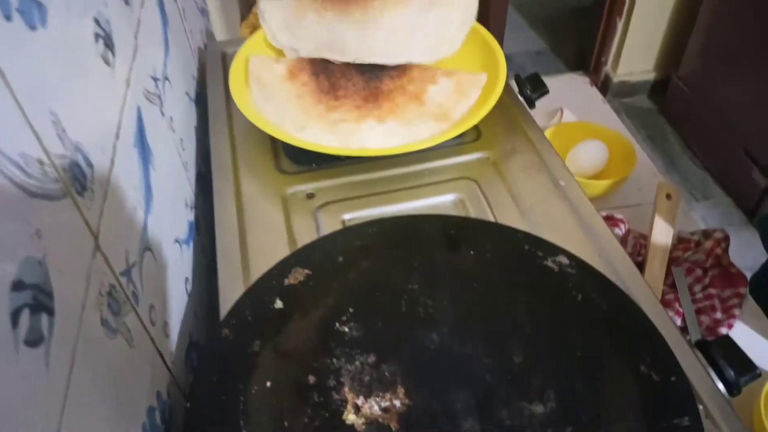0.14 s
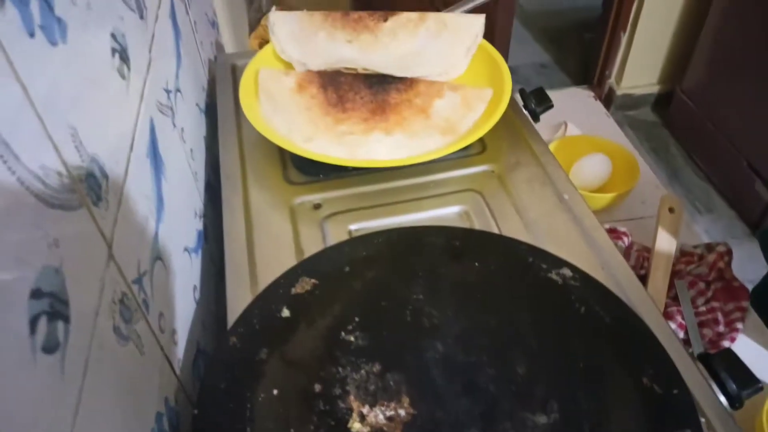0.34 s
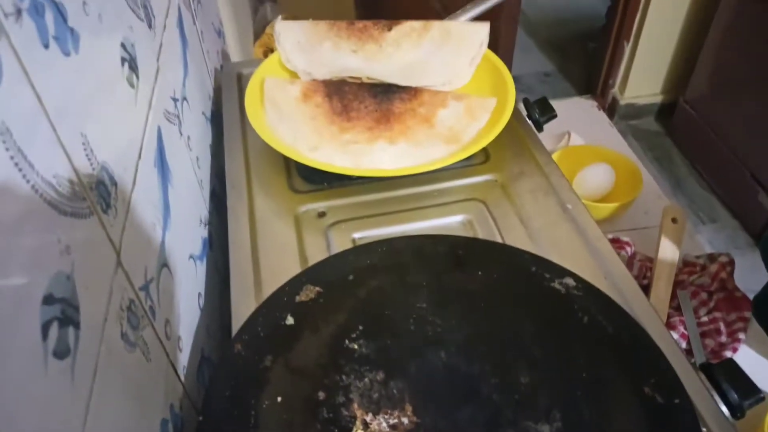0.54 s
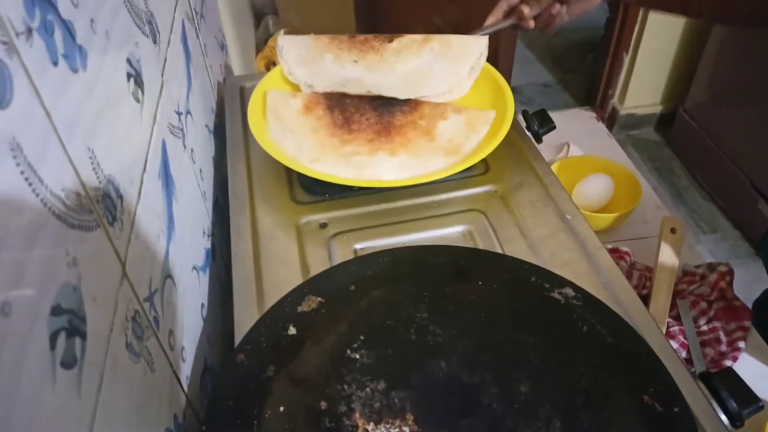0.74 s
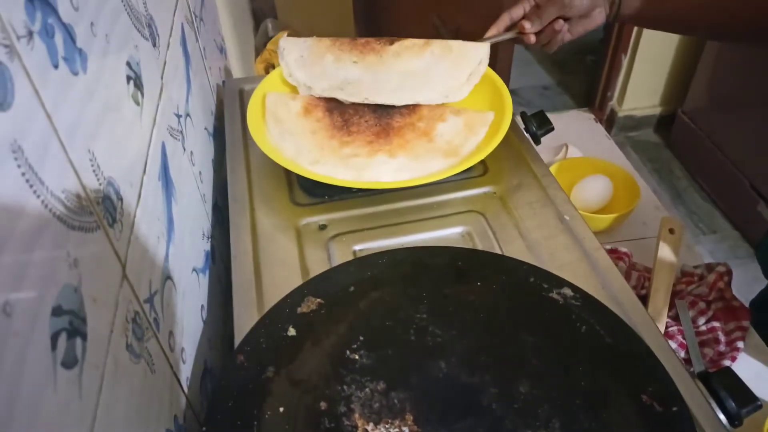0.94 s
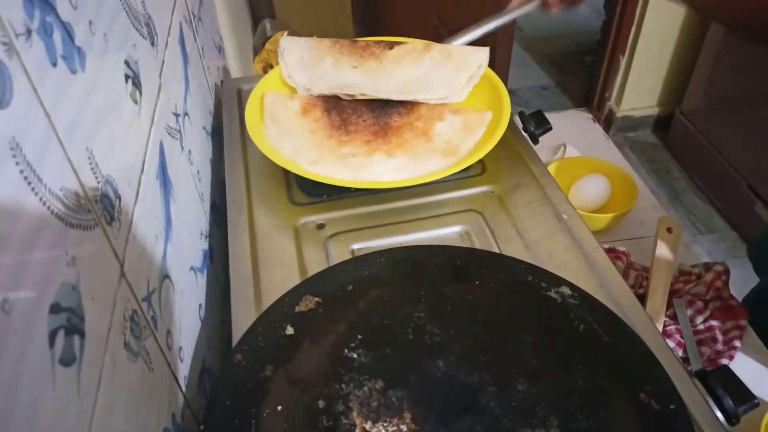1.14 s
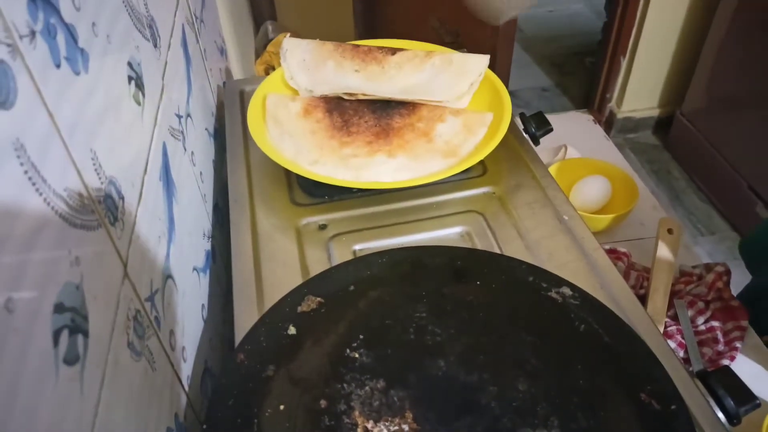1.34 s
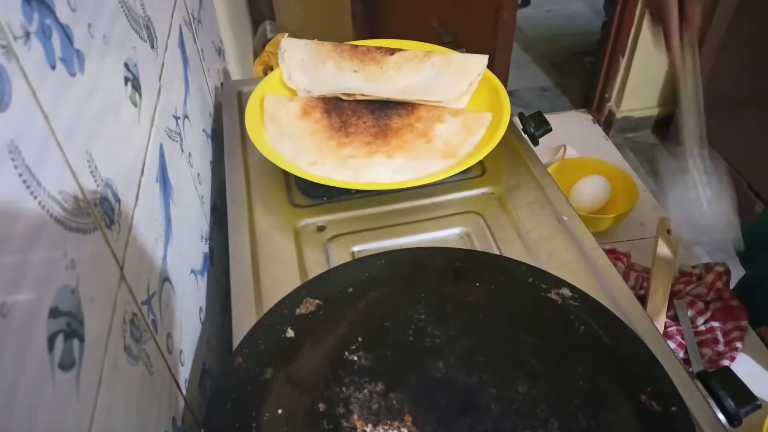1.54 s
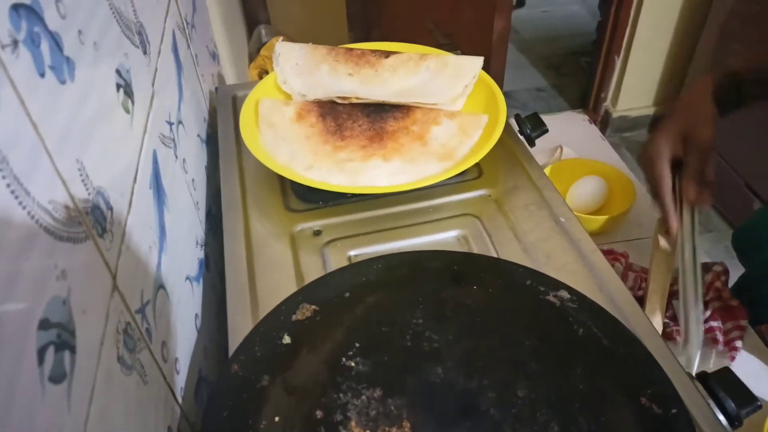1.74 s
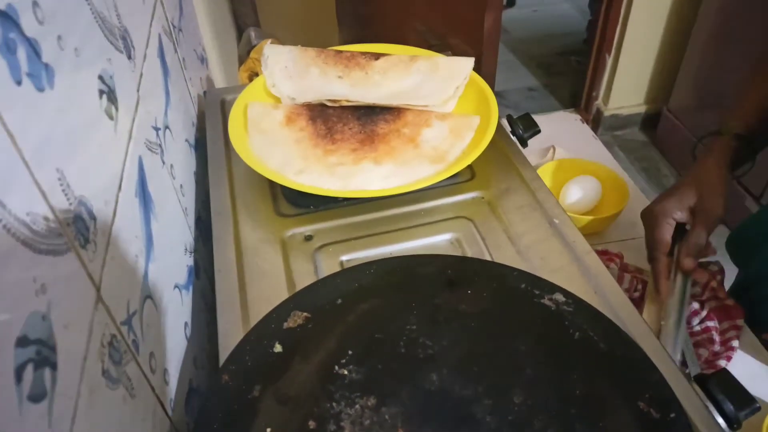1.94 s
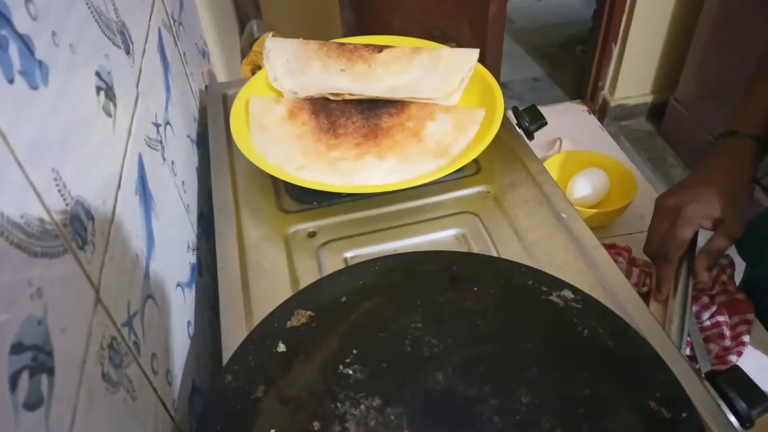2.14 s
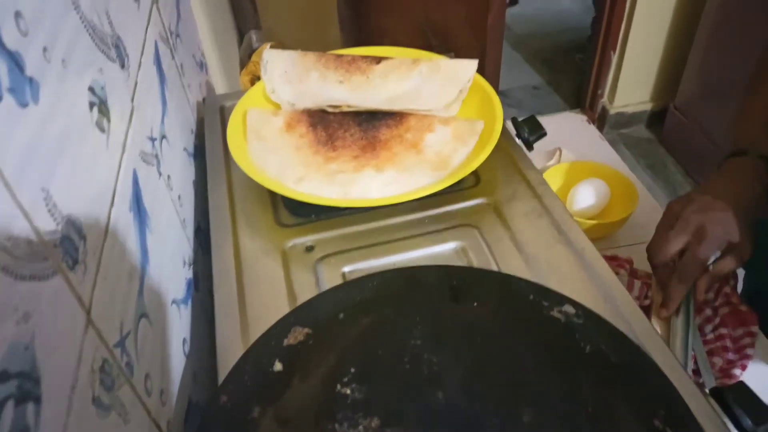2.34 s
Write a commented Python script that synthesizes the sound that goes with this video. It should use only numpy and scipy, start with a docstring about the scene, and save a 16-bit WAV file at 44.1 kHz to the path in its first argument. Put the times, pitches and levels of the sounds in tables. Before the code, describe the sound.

Close, uneven knocks of a metal spatula on a plate thud through a steel stove top in a small kitchen. The spatula slides free and is set down with a clatter, while a griddle softly hisses and pops.

```python
"""Spatula and sizzling griddle

A steel spatula knocks a folded flatbread into place on a plate, thudding through the steel stove top
beneath. It scrapes out with a faint ring and clatters down among the utensils at the side.
Close by, the hot griddle sizzles faintly and spits oil; a small tiled kitchen answers."""
import sys
import numpy as np
from scipy import signal
from scipy.fft import rfft, irfft
from scipy.io import wavfile

SR = 44100
rng = np.random.default_rng(int(sys.argv[2]) if len(sys.argv) > 2 else 0)


def output_pcm(signal):
    """Save a mono or channel-first signal as 16-bit PCM at the path in sys.argv[1].

    Samples are clipped to [-1, 1] before scaling.
    """
    pcm = np.clip(np.atleast_2d(signal).T, -1, 1) * 32767
    wavfile.write(sys.argv[1], SR, np.round(pcm).astype(np.int16))


N = 110250

# Hits on the plate: (time [s], thud [dB], click [dB], thud pitch [Hz], thud attack [cycles])
PLATE_KNOCKS = [(0.185, -38, -43, 347, 1.9), (0.2456, -22, -26, 337, 1.24), (0.2552, -8.5, -25, 392, 0.82),
                (.3402, -16, -29.5, 402, 1.2), (.4575, -22, -37, 342, 0.67),
                (0.6095, -18, -29.5, 396.4, 1.95), (0.7108, -21.5, -27, 433, 0.73),
                (0.7335, -13.5, -29, 376, 1.1), (0.9292, -17, -38.5, 375, 1.2),
                (1.1096, -16.5, -27.5, 435, 0.84), (1.187, -26.5, -25.5, 424, 1.7),
                (1.225, -28, -53, 438, 2.9), (1.267, -15, -36, 349, 0.99)]
# After-ring of plate and stove top: (pitch [Hz], level [dB], t60 [s])
STOVE_MODES = [(164.5, -2, 0.59), (186.4, 7.5, 0.13), (315, -3, 0.24), (428.4, -8, 0.21),
               (535.5, -15.5, 0.19)]
# Bright bite of the steel contact: (frequency [Hz], level [dB])
CLICK_SPECTRUM = [(100, -2), (700, 3.5), (1500, 4.5), (2900, 8.5), (4600, 0.5), (5800, 2.5), (8200, 1),
                  (10500, -15.5), (15000, -8)]
def plate(stove_db=-7.5):
    """Each knock is a steel click, a short thud and a faint after-ring of the stove top."""
    body, clicks = np.zeros((2, N))
    for s, thud_db, click_db, hz, cycles in PLATE_KNOCKS:
        add(body, s, amp(thud_db) * thud(hz, cycles))
        add(body, s, amp(thud_db + stove_db) * body_ring(STOVE_MODES, favoured_hz=hz))
        add(clicks, s, amp(click_db) * burst(CLICK_SPECTRUM, t60=0.032))
    return room(body, wet_db=-9.5, predelay_s=0.022) + room(clicks, wet_db=-0.5)


# Tight slap off the tiled corner: (delay [s], gain [signed ratio])
TILE_ECHOES = [(.0053, -.34), (.0081, -.5), (.0161, .33), (.0224, .35), (.0453, -.1)]
def thud(hz, attack_cycles, fall_octaves_per_s=7.9):
    """A damped knock of a few cycles and its early reflections, the later ones lower and duller."""
    t, out = np.arange(SR // 10) / SR, np.zeros(SR // 5)
    direct = (0.00029, 0.93)
    for delay, gain in [direct] + TILE_ECHOES:
        cycles = t * hz * 2 ** (-fall_octaves_per_s * delay)
        envelope = (cycles / attack_cycles * np.exp(1 - cycles / attack_cycles)) ** 2
        add(out, 0.0005 + delay, -gain * envelope * np.sin(2 * np.pi * cycles))
    return out


def body_ring(modes, favoured_hz, slow_below_hz=340):
    """A struck body rings; bending waves are slower at low pitch, so low modes bloom late."""
    t, out = np.arange(SR) / SR, np.zeros(SR)
    for hz, db, t60 in modes:
        octaves_below = max(0, np.log2(slow_below_hz / hz))
        lag_s, attack_s = 0.01317 * octaves_below, 0.0028 + 0.0079 * octaves_below
        swell = 1 - np.exp(-t / attack_s)
        start_db = db - 13 * abs(np.log2(hz / favoured_hz))  # far-off modes answer less
        add(out, lag_s, -amp(start_db - 60 * t / t60) * swell * np.sin(2 * np.pi * hz * t))
    return out


# Low weight under two of the knocks: (time [s], level [dB])
FRAME_BOOMS = [(1.125, -40), (1.301, -36)]
def stove_frame(hz=119, t60=1, attack_s=0.023):
    """The stove's frame swells into a low boom as the plate settles back."""
    out = np.zeros(N)
    swell = 1 - np.exp(-np.arange(SR) / SR / attack_s)
    for s, db in FRAME_BOOMS:
        add(out, s, amp(db) * swell * ringing([(hz, 0, t60)]))
    return out


# Strokes of the sliding blade: (start [s], length [s], level [dB])
BLADE_STROKES = [(0.173, 0.069, -50), (0.245, 0.034, -40), (1.104, 0.099, -44), (1.189, 0.054, -38),
                 (1.215, 0.033, -35.5), (1.27, 0.0178, -36), (1.902, 0.0235, -37)]
# Rasp of a single slip: (frequency [Hz], level [dB])
SLIP_SPECTRUM = [(700, -5), (1100, -5.5), (2700, 4), (3900, -0.5), (5800, 2.5), (8000, 3.5), (9500, -15.5),
                 (15000, -13.5)]
# Thin ring of the free blade: (pitch [Hz], level [dB], t60 [s])
BLADE_MODES = [(2194, -3, 0.11), (2627, 0.5, 0.41), (2800, -4, 0.28), (3120, 5, 0.057), (6160, -4, 0.11)]
def blade(held_t60=0.036, release_s=1.274, release_db=-37):
    """Tiny slips under each stroke excite the blade, which rings on once it comes free."""
    pressure = np.zeros(N)
    for s, length, db in BLADE_STROKES:
        add(pressure, s, amp(db) * signal.windows.tukey(round(length * SR), 0.5))
    slips = grains(per_s=2200, spread_db=1.3)
    rasp = pressure * unit(signal.fftconvolve(slips, burst(SLIP_SPECTRUM, t60=0.011))[:N])
    free_ring = ringing(BLADE_MODES)
    choked_ring = free_ring * amp(-60 * np.arange(SR) / SR / held_t60)
    out = room(rasp + amp(-13) * resonate(rasp, choked_ring), wet_db=-3)
    add(out, release_s, amp(release_db) * free_ring)
    return out


# The spatula set down: (time [s], thud [dB], clack [dB], thud pitch [Hz], shelf ring [dB])
SHELF_LANDINGS = [(1.809, -32, -39, 289, -35), (1.8315, -25, -31.5, 202, -46),
                  (1.912, -32.5, -35.5, 394, -40), (2.0393, -30, -33.5, 231, -29),
                  (2.138, -50, -38, 253, -31.5), (2.446, -77, -71, 352, -38.5)]
# Hollow ring of the utensils and their shelf: (pitch [Hz], level [dB], t60 [s])
SHELF_MODES = [(108, 0, 0.51), (171.6, -6, 0.3), (192.2, 0.5, 0.43), (255.6, 0, 0.47), (503.1, 3, 0.22),
               (701, -3.5, 0.14)]
# Darker contact of the landing: (frequency [Hz], level [dB])
CLACK_SPECTRUM = [(300, 9), (1200, -6), (2100, -2.5), (3700, -12.5), (11000, -25.5)]
def shelf():
    """The spatula lands in clacks and thuds, and the shelf rings under it."""
    body, clacks = np.zeros((2, N))
    for s, thud_db, clack_db, hz, ring_db in SHELF_LANDINGS:
        add(body, s, amp(thud_db) * thud(hz, attack_cycles=1.26))
        add(body, s, amp(ring_db) * body_ring(SHELF_MODES, favoured_hz=378))
        add(clacks, s, amp(clack_db) * burst(CLACK_SPECTRUM, t60=0.06))
    return room(body, wet_db=-3.5) + room(clacks, wet_db=1.5)


# Bright accents, each: partials (pitch [Hz], level [dB]), t60 [s], hits (time [s], level [dB])
EDGE_ON_PLATE = [(555, -2), (1254, 3.5), (2380, -3), (2830, -4), (3620, 4)], 0.034, [(1.1103, -31)]
LANDING_RING = [(813, -8), (1950, -13), (2185, -0.5), (2330, -6.5)], .08, [(1.8315, -34)]
LANDING_JINGLE = [(2143, -7), (2439, 2.5), (3025, -0.5), (3865, -3), (4818, -4), (6912, -7), (8721, 0),
                  (11070, -7)], 0.14, [(1.907, -46), (1.955, -45)]
UTENSIL_CLINK = [(1860, -6.5), (2625, 2.5)], .023, [(2.3501, -33)]
def metal_rings():
    """The blade's edge hits the plate, the spatula rings and jingles as it lands, a utensil clinks."""
    out = np.zeros(N)
    for partials, t60, hits in EDGE_ON_PLATE, LANDING_RING, LANDING_JINGLE, UTENSIL_CLINK:
        ring = ringing([(hz, db, t60) for hz, db in partials])
        for s, db in hits:
            add(out, s, amp(db) * ring)
    return room(out, wet_db=-7)


# Pops of hot oil: (time [s], level [dB])
OIL_SPITS = [(0.0835, -29), (0.121, -18), (.2462, -9.5), (0.3297, -21), (0.4057, -15.5), (0.66, -16.5),
             (0.7126, -9), (1.363, -27.5), (1.5106, -33), (2.104, -22.5), (2.1666, -23), (2.216, -21.5),
             (2.2671, -28.5)]
# Crisp snap of one pop: (frequency [Hz], level [dB])
SPIT_SPECTRUM = [(300, -26), (1500, -71), (2700, -0.5), (4000, -7), (7500, 5.5), (11000, -6), (14000, -1.5),
                 (16000, 4.5)]
def oil_spits(neutral_db=-15):
    """Oil spits off the griddle in single snaps; the smaller the spit, the brighter."""
    out = np.zeros(N)
    for s, db in OIL_SPITS:
        add(out, s, amp(db) * burst(SPIT_SPECTRUM, t60=0.0062, tilt_db=0.58 * (neutral_db - db)))
    return room(out, wet_db=-11)


# Fine frying hiss: (frequency [Hz], level [dB])
SIZZLE_SPECTRUM = [(500, -5.5), (2800, 6), (4500, -3.5), (8000, 0.5), (10500, -13), (15000, -8)]
# Fader ride on the sizzle: (time [s], level [dB])
SIZZLE_RIDE = [(0, -56), (.4, -50), (.6, -55.5), (1.4, -52.5), (1.75, -64.5), (2.0, -48), (2.45, -57.5)]
def sizzle():
    """Thousands of tiny clicks on the hot griddle blur into a hiss that swells and sinks."""
    level = amp(np.interp(np.arange(N) / SR, *np.transpose(SIZZLE_RIDE)))
    crackle = room(grains(per_s=8000, spread_db=-2.0), wet_db=-7.5)
    return level * colour(crackle, SIZZLE_SPECTRUM)


# Dark bed of kitchen noise: (frequency [Hz], level [dB])
ROOM_TONE_SPECTRUM = [(20, -36), (65, -2.5), (120, 6), (190, -2.5), (700, -15.5), (4500, -26.5),
                      (8000, -56)]
def room_tone(db=-51):
    """A steady low rush sits under everything."""
    return amp(db) * colour(rng.standard_normal(N), ROOM_TONE_SPECTRUM)


# Short tail of the tiled kitchen: (frequency [Hz], t60 [s])
KITCHEN_DECAY = [(150, 0.54), (400, 0.45), (2800, 0.45), (7500, 0.3), (15000, 0.35)]
def room(x, wet_db, predelay_s=0.004):
    """Adds the kitchen's dense reflections, each band dying at its own speed."""
    hz, t, bands = signal.stft(rng.standard_normal(SR), SR)
    tail = signal.istft(bands * amp(-60 * t / curve_at(KITCHEN_DECAY, hz)[:, None]), SR)[1]
    tail *= np.arange(len(tail)) > predelay_s * SR
    return x + amp(wet_db) * resonate(x, tail)


def ringing(modes):
    """Dying partials of struck metal."""
    t = np.arange(SR) / SR
    return sum(amp(db - 60 * t / t60) * np.sin(2 * np.pi * hz * t) for hz, db, t60 in modes)


def burst(spectrum, t60, tilt_db=0):
    """A contact transient: resonances so dense and brief that they sound as noise."""
    t = np.arange(SR // 10) / SR
    return colour(rng.choice([-1., 1.], len(t)), spectrum, tilt_db) * amp(-60 * t / t60)


def grains(per_s, spread_db):
    """A random train of tiny clicks of uneven size."""
    sizes = rng.standard_normal(N) * amp(spread_db * np.minimum(rng.exponential(1, N), 4))
    return sizes * (rng.random(N) < per_s / SR)


def resonate(x, response):
    """Plays a signal through an impulse response scaled to unit energy."""
    return signal.fftconvolve(x, response / np.linalg.norm(response))[:N]


def colour(x, spectrum, tilt_db=0):
    """Applies an EQ curve and a tilt per octave, and returns rms 1."""
    hz = np.fft.rfftfreq(len(x), 1 / SR)
    eq_db = curve_at(spectrum, hz) + tilt_db * np.log2(hz + 20)
    return unit(irfft(rfft(x) * amp(eq_db), len(x)))


def curve_at(points, hz):
    """Reads a curve on a log-frequency axis."""
    point_hz, values = np.transpose(points)
    return np.interp(np.log(hz + 1), np.log(point_hz), values)


def add(mix, s, sound):
    """Mixes a sound in at time s."""
    part = mix[round(s * SR):][:len(sound)]
    part += sound[:len(part)]


def amp(db):
    """Decibels to gain."""
    return 10 ** (np.asarray(db) / 20)


def unit(x):
    """Scales to rms 1."""
    return x / np.sqrt(np.mean(x ** 2) + 1e-20)


def scene():
    """The mono mix: spatula up front, griddle behind it, room tone underneath."""
    spatula = plate() + shelf() + stove_frame() + blade() + metal_rings()
    return (spatula + oil_spits() + sizzle() + room_tone())[None]


def record(dry):
    """The microphone's bass cut at 50 Hz and the band limit at 16.1 kHz."""
    bass_cut = signal.butter(3, 50, "highpass", fs=SR, output="sos")
    top_cut = signal.firwin(255, 16100, window=("kaiser", 9), fs=SR)
    return signal.oaconvolve(signal.sosfilt(bass_cut, dry), top_cut[None], "same")


dry = scene()
out = record(dry)
output_pcm(out)
```